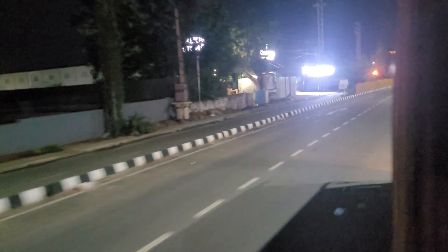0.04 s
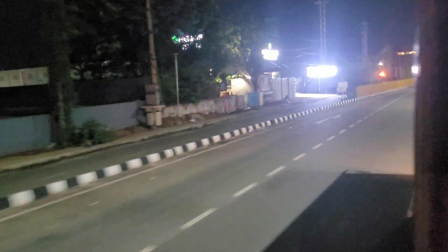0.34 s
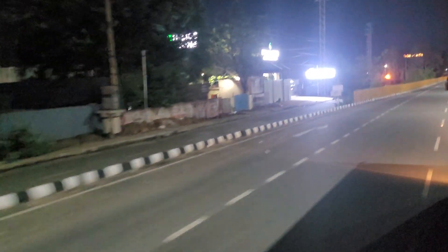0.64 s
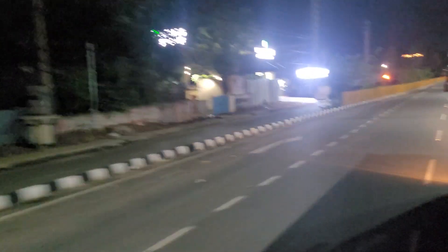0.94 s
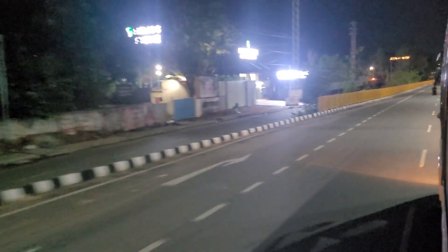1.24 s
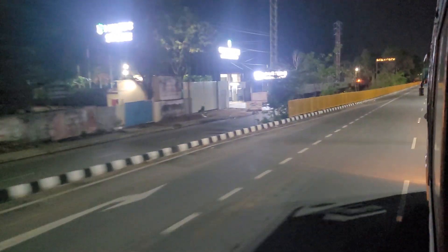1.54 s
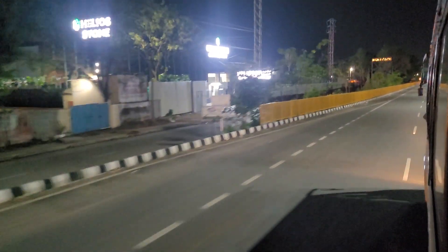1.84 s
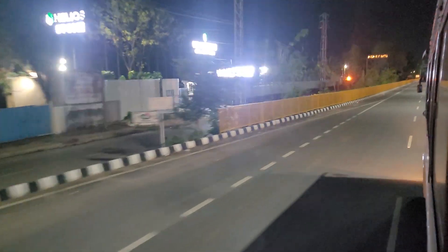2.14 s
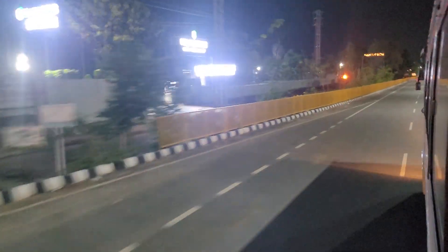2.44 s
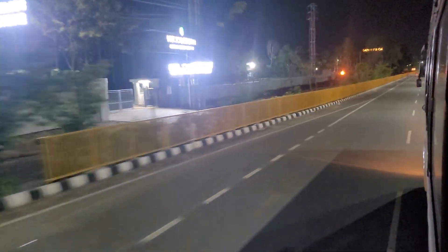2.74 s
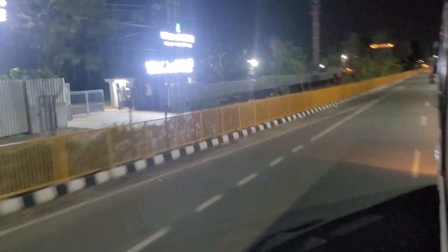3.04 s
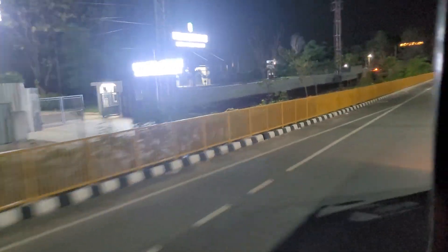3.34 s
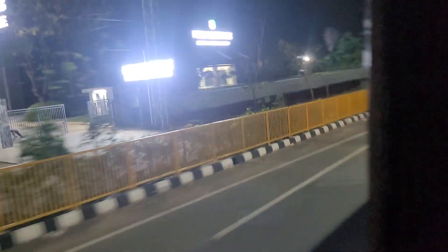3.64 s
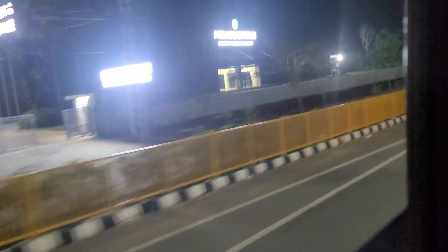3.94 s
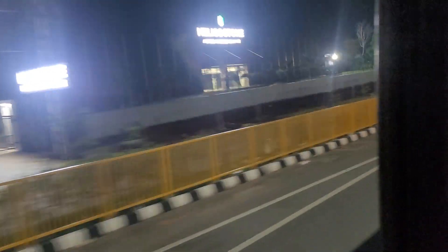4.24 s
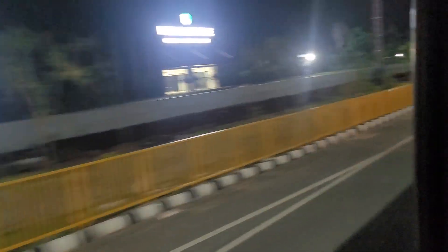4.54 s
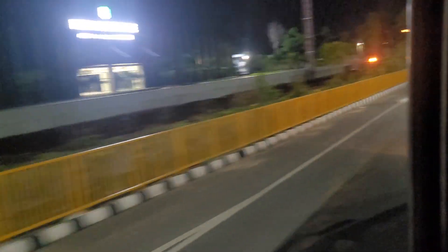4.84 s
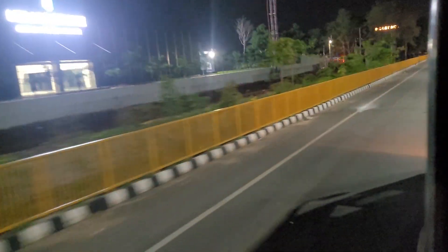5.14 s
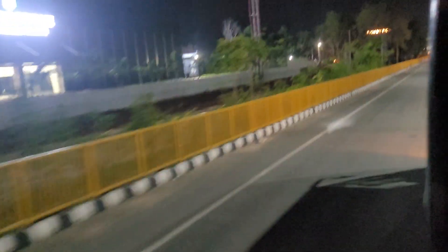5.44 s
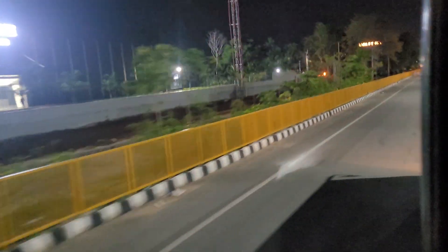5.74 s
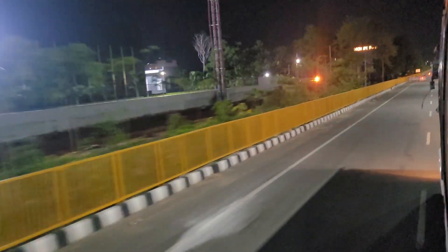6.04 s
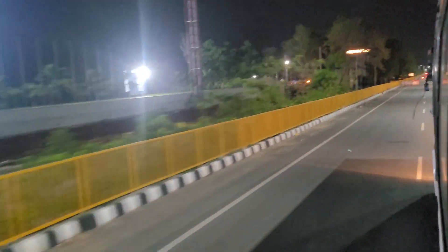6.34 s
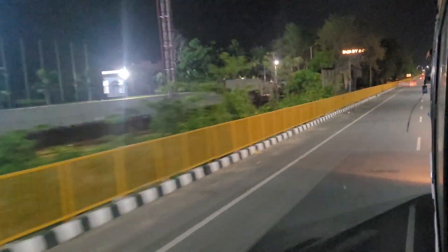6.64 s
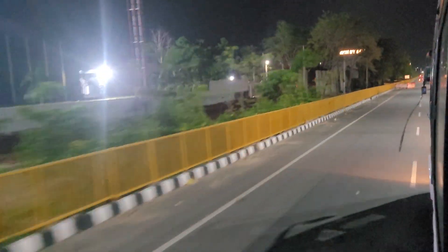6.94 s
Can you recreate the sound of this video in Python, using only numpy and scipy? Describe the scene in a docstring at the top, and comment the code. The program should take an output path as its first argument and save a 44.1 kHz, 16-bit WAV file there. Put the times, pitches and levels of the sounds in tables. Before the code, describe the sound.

Wind rushes over a microphone at the open window of a moving bus, with hollow hooting gusts, low thumps and sharp crackles. The buffeting is strong at first, eases, then grows roughest just past the middle before settling into a softer rush. Underneath, the engine drones and the tyres hiss on the road, with an occasional dull body knock and a tick from the window frame.

```python
"""Wind at an open bus window

A bus drives along a night road with a microphone at an open window. Air streams over the
microphone's two openings (ports), and swirls of air (eddies) hit them as gusts that hoot and fizz.
Big pressure swings thump; air tearing off the port edges pops and crackles. Under the wind
the engine drones, the tyres hiss, the body knocks and the window frame ticks now and then."""
import sys
import numpy as np
from scipy import signal
from scipy.fft import rfft, irfft
from scipy.io import wavfile
from scipy.ndimage import uniform_filter1d

SR = 44100
rng = np.random.default_rng(int(sys.argv[2]) if len(sys.argv) > 2 else 0)


def int16_out(signal):
    """Quantize to a 16-bit WAV file."""
    q = np.round(np.clip(np.atleast_2d(signal).T, -1, 1) * 32767)
    wavfile.write(sys.argv[1], SR, q.astype(np.int16))


N = 308259
TIME = np.arange(N) / SR

# strength of the air stream at the window: (time [s], level [dB])
STREAM = [(0, -26), (0.28, -31.5), (0.75, -32.5), (1, -32), (1.4, -31), (2.2, -32.5), (2.45, -26),
          (2.65, -30.5), (3.33, -30.5), (3.48, -26.5), (3.68, -32.5), (4.15, -31), (4.62, -33), (4.76, -28),
          (4.92, -30.5), (5.2, -35.5), (6.05, -34), (6.6, -33)]
# how far the air has turned from head-on (0) to skimming the ports (1): (time [s], share [0-1])
GRAZING = [(4.8, 0.68), (5.05, 1), (6.0, 1), (6.99, 0.92)]
# how hard the air tears at a port's edge: (time [s], level [dB])
TEARING = [(0, -53), (.7, -79), (2.1, -99), (2.45, -50), (3.25, -73), (3.42, -52), (3.8, -56.5),
           (4.33, -46.5), (4.8, -54), (5.3, -52), (6.2, -62), (6.75, -51.5)]
# big eddies: (time [s], level [dB], length [s], swirl pitch [Hz], hoot's share of the power [0-1])
GUSTS = [(.006, -19, 0.0082, 1010, 0.54), (0.05, -22, 0.01, 790, 0.5), (0.059, -28, 0.0057, 1080, 0.5),
         (.089, -17.5, 0.0084, 796, 0.4), (0.135, -17, 0.014, 737, 0.4), (0.175, -17, 0.014, 1080, 0.03),
         (0.36, -20.5, 0.01, 724, 0.1), (0.414, -23.5, 0.034, 996, 0), (.536, -22, 0.0049, 400, 0.57),
         (0.617, -17, 0.0084, 796, 0.5), (0.715, -30, 0.0065, 317, 0.2), (0.848, -23.5, 0.012, 340, 0.6),
         (.885, -29, 0.021, 777, 0.5), (.912, -30, 0.015, 498, 0.1), (1.079, -23.5, 0.013, 518, 0.04),
         (1.195, -23, 0.013, 726, 0.02), (1.321, -27, 0.0091, 260, 0), (1.426, -22.5, 0.022, 761, 0.42),
         (1.56, -21, 0.017, 785, 0.17), (1.594, -26, 0.016, 266, 0.6), (1.659, -24, 0.012, 390, 0),
         (1.745, -23.5, 0.017, 650, 0.03), (1.768, -23, 0.0057, 266, 0.56), (1.879, -21, 0.013, 880, 0.28),
         (1.951, -26.5, 0.028, 517, 0), (2.009, -21.5, 0.01, 393, 0.7), (2.057, -18.5, 0.0043, 307, 1),
         (2.093, -22, 0.014, 744, 0.07), (2.249, -24, 0.0092, 885, 0.6), (2.293, -21.5, 0.022, 730, 0.2),
         (2.38, -29, 0.039, 854, 0.8), (2.433, -22, 0.022, 830, 0.1), (2.581, -24, 0.014, 1040, 0.04),
         (2.64, -42, 0.0063, 316, 0), (2.736, -25, 0.01, 324, 0.8), (2.763, -25, 0.0085, 810, 0.04),
         (2.801, -20, 0.011, 420, 0.13), (2.832, -24, 0.021, 764, 0.05), (3.031, -20, 0.0057, 760, 0.1),
         (3.07, -19, 0.021, 730, 0.12), (3.133, -26, 0.026, 837, 0.15), (3.246, -26, 0.015, 409, 0.8),
         (3.324, -24, 0.011, 347, 0.5), (3.4, -18, 0.014, 870, 0), (3.453, -17.5, 0.0078, 810, 0.9),
         (3.474, -18.5, 0.0068, 810, 0.85), (3.513, -17.5, 0.023, 776, 0.4), (3.549, -20, 0.0076, 940, 0.5),
         (3.674, -24.5, 0.017, 890, 0.3), (3.747, -25.5, 0.0063, 690, 0.6), (3.789, -13, 0.01, 1060, 0),
         (3.808, -18.5, 0.008, 770, 0.8), (3.885, -22, 0.012, 386, 0), (3.925, -24.5, 0.0081, 596, 0),
         (4.017, -16, 0.016, 906, 0.2), (4.061, -22, 0.018, 780, 0.06), (4.121, -24, 0.023, 834, 0.56),
         (4.195, -25, 0.035, 798, 0.2), (4.24, -17, 0.01, 454, 0.45), (4.288, -19.5, 0.012, 1000, 0),
         (4.331, -16, 0.019, 748, 0.09), (4.404, -20, 0.014, 457, 0.36), (4.441, -19, 0.015, 1028, 0.1),
         (4.475, -16, 0.012, 1110, 0.25), (4.542, -20, 0.006, 336, 0.2), (4.588, -21, 0.01, 890, 0.28),
         (4.662, -26, 0.011, 825, 0), (4.724, -21.5, 0.028, 790, .45), (4.756, -29.5, 0.0088, 905, 0.7),
         (4.775, -20, 0.017, 744, 0.4), (4.825, -18, 0.0098, 760, 0.02), (4.848, -26, 0.0033, 770, 0),
         (4.9, -25, 0.014, 1390, 0.8), (4.933, -20.5, 0.011, 1420, 0.17), (4.955, -28, 0.011, 1650, 0.6),
         (5.021, -24, 0.0046, 714, 0.17), (5.059, -23.5, 0.025, 920, 0), (5.619, -28, 0.034, 700, 0.01),
         (5.67, -24, 0.017, 610, 0.06), (5.798, -34.5, 0.019, 309, 0.7), (5.957, -21.5, 0.014, 580, 0.3),
         (5.984, -18, 0.0087, 544, 0.4), (6.002, -23, 0.017, 1150, 0.4), (6.213, -27.5, 0.011, 373, 0.05),
         (6.345, -26.5, 0.026, 328, 0.07), (6.474, -24, 0.023, 356, 0), (6.536, -24, 0.025, 360, 0.24),
         (6.662, -26.5, 0.012, 345, 0.24), (6.742, -22.5, 0.012, 1150, 0), (6.801, -26.5, 0.038, 304, 0),
         (6.928, -21, 0.0095, 382, 0.1)]
# tone colours of head-on air, skimming air and deep rumble: (frequency [Hz], level [dB])
HEAD_ON_COLOUR = [(60, -24), (150, -5.5), (260, 2), (400, -1), (600, -1.5), (745, 6.5), (900, 4),
                  (1300, -8), (1650, -25), (2200, -34.5), (3000, -47), (5000, -56), (9000, -66),
                  (16000, -81)]
GRAZING_COLOUR = [(60, -12), (170, -3.5), (280, 3), (470, -3.5), (620, -8), (800, -12), (930, -10.5),
                  (1130, -6), (1400, -9.5), (2100, -17), (2900, -29), (3400, -32.5), (5000, -43.5),
                  (9000, -66), (16000, -78)]
RUMBLE_COLOUR = [(12, -13.5), (25, -11), (45, -8), (66, 2), (90, -3), (140, -4), (200, -11), (350, -28),
                 (800, -67.5)]
USUAL_SWIRL_HZ = 663


def gain_of(db):
    """Turns decibels into a factor to multiply by."""
    return 10 ** (np.asarray(db) / 20)


def evened(x):
    """Scales a signal to an average power of 1."""
    return x / np.sqrt(np.mean(x ** 2) + 1e-20)


def at(s, curve):
    """A curve's value at time s."""
    return np.interp(s, *np.transpose(curve))


def ports(pan_db):
    """Left and right gains; pan is the left level minus the right."""
    gains = gain_of(np.array([[.5], [-.5]]) * pan_db)
    return gains / np.sqrt(np.mean(gains ** 2, axis=0))


def add(mix, s, sound):
    """Mixes a stereo sound in at time s."""
    part = mix[:, max(round(s * SR), 0):][:, :sound.shape[1]]
    part += sound[:, :part.shape[1]]


def noise(size=N):
    """White noise, different left and right."""
    return rng.standard_normal((2, size))


def wander(hz, channels=2):
    """A smooth random curve that moves up to about hz times a second."""
    keep = np.exp(-(np.fft.rfftfreq(N, 1 / SR) / hz) ** 2)
    return evened(irfft(rfft(rng.standard_normal((channels, N))) * keep, N))


def response(points, size=4096):
    """A filter's answer to one click, with the given tone colour and energy 1."""
    hz, db = np.transpose(points)
    bin_hz = abs(np.fft.fftfreq(size, 1 / SR)) + 1
    log_gain = np.log(gain_of(np.interp(np.log(bin_hz), np.log(hz), db)))
    spectrum = np.exp(np.conj(signal.hilbert(log_gain)))  # nothing rings before the click
    taps = np.fft.ifft(spectrum).real[:size // 2]
    return taps / np.linalg.norm(taps)


def colour(x, points):
    """Filters both channels to a tone colour."""
    return signal.oaconvolve(x, response(points)[None], axes=1)[:, :N]


def turbulence(flicker_db, flicker_hz, size=1300):
    """Churning air: noise that comes in clumps, its power evened out over size samples."""
    clumps = noise() * gain_of(flicker_db * wander(flicker_hz))
    return clumps / np.sqrt(uniform_filter1d(clumps ** 2, size, axis=1) + 1e-9)


def span(s, before, after):
    """The samples around time s."""
    return slice(max(int((s - before) * SR), 0), int((s + after) * SR))


def swell(t, length, lean):
    """Power of one passing eddy, 1 at t = 0; lean makes it rise faster than it dies."""
    u = 2 * t / length
    return 2 ** -((u / (1 + lean * np.tanh(2 * u))) ** 2)


def lulls(length_s=0.043):
    """How many dB the wind drops as it briefly lets go of the ports."""
    # lulls, where a negative dip is a rise: (time [s], dip [dB])
    dips = [(.285, 3.5), (0.569, 3), (.69, 0), (0.751, 7), (1.228, 1.5), (1.365, 3.5), (1.63, 3), (1.8, -3),
            (1.985, 6), (2.15, -0.5), (2.68, 4), (2.97, 1), (3.288, 3), (3.728, 5), (3.848, 3), (4.16, 5.5),
            (4.512, 0.5), (4.995, 5.5), (5.15, 4.5), (5.205, 6), (5.54, 0), (5.74, 4), (5.895, 5),
            (6.14, 4)]
    return sum(db * np.exp(-(2 * (TIME - s) / length_s) ** 2) for s, db in dips)


def road_roar(level_db=-45.5):
    """The road fills the cabin with a low roar."""
    # the cabin's tone colour: (frequency [Hz], level [dB])
    cabin_colour = [(15, -39), (50, 13), (100, 2.5), (190, 0), (290, -4), (430, -8.5), (800, -32),
                    (1200, -22), (1700, -6.5), (2300, -9), (3000, -37), (6000, -49)]
    return colour(noise() * gain_of(level_db + 0.77 * wander(25)), cabin_colour) * ports(0.92)


def jolts(level_db=-46, bumpy_db=5.5):
    """Jolts make the cabin panels throb; the throb dips along with the wind's lulls."""
    # the panels' tone colour: (frequency [Hz], level [dB])
    panel_colour = [(20, 3), (60, -17), (110, -2.5), (190, -4), (270, 4.5), (400, -11), (600, -14),
                    (1200, -56), (4000, -79)]
    shaking = noise() * gain_of(level_db + bumpy_db * wander(7.5, channels=1) - 0.72 * lulls())
    return colour(shaking, panel_colour)


def tyres():
    """The tyres hiss on the road outside."""
    # strength of the hiss: (time [s], level [dB])
    hiss_levels = [(0, -59), (1.48, -58.5), (2.45, -57), (3.29, -56), (4.67, -62.5), (4.98, -59),
                   (5.88, -58), (6.35, -54.5)]
    # its tone colour: (frequency [Hz], level [dB])
    hiss_colour = [(500, -35), (2000, 11), (3200, 5.5), (4500, 4.5), (6000, 3.5), (7500, 4), (9000, -1),
                   (10200, 0.5), (12200, -0.5), (14000, -5), (16000, -7.5)]
    hiss = noise() * gain_of(at(TIME, hiss_levels) + 0.5 + 1.5 * wander(28))
    return colour(hiss, hiss_colour) * ports(0.93)


def engine(firing_hz=69.5, level_db=-56, waver=0.017):
    """The engine's firing makes one low, wavering tone."""
    turns = np.cumsum(firing_hz * (1 + waver * wander(5, channels=1))) / SR
    return np.sqrt(2) * gain_of(level_db + wander(2.8)) * np.sin(2 * np.pi * turns)


def frame_ticks(rise_s=0.0086, fade_60db_s=0.078, size=12000):
    """The loose window frame ticks brightly in its rail."""
    # ticks: (time [s], level [dB], ring pitch [Hz])
    ticks = [(2.596, -42, 12000), (5.283, -58, 7600), (6.075, -51, 9600), (6.867, -46.5, 9200)]
    out, t = np.zeros((2, N)), np.arange(size) / SR
    for s, db, hz in ticks:
        metal = response([(hz / 4, -20), (hz / 2, -6), (hz / 1.2, -4),
                          (hz, 0), (hz * 1.2, -4), (hz * 2, -9)])
        chatter = noise(size) * gain_of(db + 4.5 - 60 * t / fade_60db_s)
        chatter *= 1 - np.exp(-t / rise_s)
        add(out, s, signal.oaconvolve(chatter, metal[None], axes=1))
    return out


def body_knocks(rise_s=0.0013):
    """The bus body answers bumps in the road with a dull knock."""
    # knocks: (time [s], level [dB], pitch [Hz], time to fade by 60 dB [s])
    knocks = [(0.531, -13, 384, 0.03), (2.605, -18.5, 140, 0.12), (4.285, -17.5, 77.5, 0.11),
              (5.391, -20, 280, 0.035), (5.443, -24.5, 292, 0.089)]
    out, t = np.zeros((2, N)), np.arange(12000) / SR
    for s, db, hz, fade_s in knocks:
        ring = np.sin(2 * np.pi * hz * t) * (1 - np.exp(-t / rise_s))
        add(out, s, ports(1.5) * ring * gain_of(db - 60 * t / fade_s))
    return out


def rumble(base_db=-36, usual_stream_db=-33.5, sway_db=2.5):
    """Large eddies keep shaking the air in the window opening."""
    # head-on air rumbles mostly on the left, skimming air more evenly: (time [s], pan [dB])
    pans = [(0, 7), (4.7, 10), (5.1, 6.5), (6.99, -2)]
    level_db = base_db + 0.45 * (at(TIME, STREAM) - usual_stream_db) - 2 * at(TIME, GRAZING)
    level_db += sway_db * wander(0.83, channels=1)[0] - 0.55 * lulls()
    flow = gain_of(level_db) * ports(at(TIME, pans))
    return colour(flow * turbulence(flicker_db=5, flicker_hz=49.7), RUMBLE_COLOUR)


def stream(split_hz=520):
    """The steady stream of air sounds the ports, which ring hollow when it meets them head-on."""
    grazing = at(TIME, GRAZING)
    sway_db = 1.8 * (1 - .4 * grazing) * wander(30, channels=1)  # skimming air is calmer
    push = gain_of(at(TIME, STREAM) + 0.66 + sway_db - lulls())
    # large (low) and small (high) eddies come and go separately
    lows, highs = (signal.butter(3, split_hz, kind, fs=SR, output="sos") for kind in ("low", "high"))
    large = signal.sosfilt(lows, turbulence(flicker_db=11, flicker_hz=89))
    small = signal.sosfilt(highs, turbulence(flicker_db=3.5, flicker_hz=152))
    small *= gain_of(1.3 * wander(35))
    large *= gain_of(0.5 * wander(21))
    air = push * (large + small)
    head_on = colour(air * np.sqrt(1 - grazing), HEAD_ON_COLOUR)
    return head_on + colour(air * np.sqrt(grazing), GRAZING_COLOUR)


def crackle(snaps_per_s=170, spread_db=4.3, fade_s=0.001, pan_db=-3.5):
    """Tiny pressure snaps of uneven size where the air tears away from a port."""
    # the snaps' tone colour: (frequency [Hz], level [dB])
    snap_colour = [(500, -40), (1800, 11), (2800, 5), (3900, 1.5), (5200, -5.5), (7700, -12), (12000, -14),
                   (16000, -21)]
    sizes = gain_of(spread_db * np.minimum(rng.exponential(1, (2, N)), 3))
    snaps = sizes * (rng.random((2, N)) < snaps_per_s / SR)
    tails = signal.lfilter([1], [1, -np.exp(-1 / (fade_s * SR))], snaps)
    spray = evened(tails * noise())
    return colour(spray * gain_of(at(TIME, TEARING) - lulls()) * ports(pan_db), snap_colour)


def fizz(offset_db=-28, db_per_octave=8.5, usual_tearing_db=-54.5):
    """A gust fizzes at its peak, the more the faster it swirls and the harder the air tears."""
    # the fizz's tone colour: (frequency [Hz], level [dB])
    fizz_colour = [(1000, -43), (2000, 18.5), (2800, 9.5), (4000, 4), (5500, -13), (8000, -15),
                   (15000, -43)]
    power = np.zeros(N)
    for s, db, length, swirl_hz, _ in GUSTS:
        fizz_db = db + offset_db + db_per_octave * np.log2(swirl_hz / USUAL_SWIRL_HZ)
        fizz_db += at(s, TEARING) - usual_tearing_db
        near = span(s, 4 * length, 4 * length)
        power[near] += gain_of(fizz_db) ** 2 * swell(TIME[near] - s, length, lean=0.14)
    return colour(np.sqrt(power) * turbulence(flicker_db=-1, flicker_hz=215), fizz_colour)


def thumps(churn_db=-6.5, thump_db=-2, lead_s=0.0045):
    """A heavy pressure swing thumps one port, then the other, inside a swell of churning air."""
    # swings in the window opening: (time [s], level [dB], length [s], pan [dB], right port's delay [s])
    swings = [(0.026, -24, 0.021, 5, 0.0036), (0.097, -28.5, 0.045, 17, -0.004),
              (0.172, -23, 0.018, 2, -0.004), (0.222, -27, 0.026, 21, 0.002),
              (0.371, -24, 0.019, 16, 0.008), (0.432, -33, 0.017, 18, 0.007), (0.629, -40, 0.024, 3, 0.008),
              (0.925, -31, 0.03, 1, -0.005), (1.059, -32, 0.034, 7, 0.002), (1.184, -32, 0.021, 1, -0.008),
              (1.313, -29.5, 0.02, -13, -0.0064), (1.462, -31, 0.025, 1, -0.001),
              (1.782, -33, 0.027, 8, 0.00016), (1.889, -22.5, 0.013, 5, 0.001),
              (2.303, -30, 0.015, 17, 0.003), (2.459, -36, 0.032, 16, 0.003),
              (2.526, -35, 0.029, -5, -0.006), (2.758, -27, 0.021, -2, -0.0),
              (2.828, -31.5, 0.039, 6, -0.001), (3.33, -30, 0.027, 1, -0.005),
              (3.444, -22.0, 0.015, 11, 0.0044), (3.528, -19.5, 0.02, 0, -0.007),
              (3.594, -26, 0.032, 20, 0.003), (3.669, -28.5, 0.039, 7, -0.003),
              (3.784, -19, 0.017, -2, -0.005), (3.901, -23.5, 0.023, 4, 0.0037),
              (3.977, -28, 0.028, 20, 0.029), (4.067, -25, 0.018, 0, 0.005), (4.146, -29, 0.052, 20, 0.021),
              (4.292, -20.5, 0.027, 14, -0.00064), (4.381, -23.5, 0.047, -2, -0.007),
              (4.475, -21, 0.016, 0, 0.006), (4.656, -25.5, 0.022, 19, -0.003),
              (4.719, -18.5, 0.018, 5, -0.0045), (4.771, -23, 0.021, 3, 0.0016),
              (4.826, -25, 0.017, -13, -0.0), (4.924, -21.5, 0.019, 0.5, -0.007),
              (4.968, -30, 0.025, 0, 0.00024), (5.046, -28, 0.03, -3, -0.0051),
              (5.618, -32, 0.036, 1, 0.005), (5.673, -29, 0.02, 3, 0.001), (5.807, -32, 0.03, 3, 0.001),
              (5.99, -20.5, 0.018, 4, 0.0), (6.079, -32, 0.022, 11, -0.0061),
              (6.223, -29.0, 0.027, -1, 0.001), (6.283, -28, 0.03, 0, 0.002),
              (6.378, -34, 0.034, 11, 0.015), (6.44, -26, 0.021, -4, 0.001),
              (6.56, -24.5, 0.018, 0, -0.0017), (6.742, -34, 0.019, 0, -0.000012),
              (6.953, -24, 0.018, 9.5, 0.0)]
    out, air = np.zeros((2, N)), turbulence(flicker_db=7.5, flicker_hz=50)
    for s, db, length, pan_db, lag_s in swings:
        gain = gain_of(db) * ports(pan_db)
        near = span(s, 3 * length, 4 * length)
        push = np.sqrt(swell(TIME[near] - s, length, lean=0.58))
        out[:, near] += gain * gain_of(churn_db) * air[:, near] * push
        thump = gain * gain_of(thump_db) * np.sqrt(length * SR) * rng.choice([-1, 1])
        add(out, s - lead_s - lag_s / 2, thump * [[1], [0]])
        add(out, s - lead_s + lag_s / 2, thump * [[0], [1]])
    return colour(out, RUMBLE_COLOUR)


def slaps(rise_s=0.0001, fade_s=0.0022, flaps=3, gap_s=0.00219, flap_step_db=-4.5, size=700):
    """A jet of air breaks off a port's edge: it spits hiss, and its weakening flaps pop the port."""
    # the sharpest slaps: (time [s], spit level [dB], pop level [dB], pan [dB])
    hits = [(0.0052, -27.5, -14.5, 1), (0.0646, -35.0, -16, -1), (0.0881, -23, -9.5, -16),
            (0.0936, -32, -21, -7), (0.1084, -39.0, -15.5, 17), (0.1468, -39, -15.5, 14),
            (0.1686, -20.5, -11.5, -23), (0.1778, -28, -14, -9), (0.2556, -32, -20.5, -20),
            (0.3392, -34, -19, -11), (0.3579, -36, -18, 11), (0.3971, -32, -16.5, -14),
            (0.4067, -28, -15, -9), (0.52, -30, -20.5, -10), (0.6171, -51, -21, 7), (1.187, -38.0, -15, 6),
            (1.4246, -46.5, -22, 0), (1.8752, -51, -18, -5), (2.278, -38, -17, -3), (2.2926, -36, -20, 9),
            (2.4291, -30, -15.5, -8), (2.4828, -27.5, -10.5, -1), (2.8256, -31.5, -14, -6),
            (3.392, -29.5, -10.5, -9), (3.405, -26, -22, -19), (3.4163, -46.0, -17, -12),
            (3.435, -32, -24, -15), (3.4548, -35.5, -17, -5), (3.472, -37, -17, 2), (3.5, -35.5, -17.0, 2),
            (3.5165, -26.5, -13.0, -10), (3.5533, -40, -18.0, -11), (3.5805, -31, -21, -15),
            (3.7055, -30, -22, -10), (3.7798, -29, -10, -1), (3.7902, -46, -15, 15), (3.882, -31, -21, -11),
            (3.9628, -31, -17, -16), (3.9841, -28, -16.5, -18), (4.0215, -31, -11.5, 2),
            (4.054, -28.5, -11, -5), (4.0674, -42, -10, -12), (4.121, -34, -16, -18), (4.2364, -44, -17, 4),
            (4.269, -34, -34.0, -9), (4.283, -34, -17, 10), (4.2896, -24, -16, -17), (4.3034, -30, -31, -9),
            (4.323, -38, -15, 4), (4.3359, -17.5, -14.0, 2), (4.3436, -26, -10.5, 1),
            (4.3524, -31, -18, -19), (4.3746, -27, -14, -12), (4.4087, -38, -24.5, -13),
            (4.4418, -36, -14, 7), (4.4797, -22, -11.5, -13), (4.494, -32, -18, -15),
            (4.5805, -48, -17, 16), (4.5869, -50, -20, -22), (4.6275, -30, -19, -11),
            (4.7259, -40.5, -22, 5), (4.7393, -30, -16, -4), (4.7436, -27, -32, -3), (4.7693, -30, -23, 0),
            (4.7801, -27.0, -14.5, 15), (4.822, -28, -10.0, -10), (4.848, -35.0, -14.5, 9),
            (4.8979, -33, -13, 1), (4.9329, -35, -19.5, 3), (5.9542, -42.0, -28, -11),
            (5.9805, -28.5, -20, -4), (5.9878, -28, -15.0, -2), (6.0068, -23.5, -20, -15)]
    # tone colours of the spit and the hollow pop: (frequency [Hz], level [dB])
    spit_colour = [(300, -20), (1000, -7), (2300, 29), (3800, 15), (5000, 10.5), (6300, 1.5), (7600, 2.5),
                   (9500, -5), (15000, -8)]
    pop_colour = [(60, -36.5), (300, -1), (580, -7.5), (800, 1.5), (1300, -5.5), (2000, -14), (3000, -43.5),
                  (5000, -51), (9000, -58), (16000, -74)]
    spit, pop, t = np.zeros((2, N)), np.zeros((2, N)), np.arange(size) / SR
    strengths = gain_of(flap_step_db * np.arange(flaps))
    strengths *= np.sqrt(0.0018 * SR) / np.linalg.norm(strengths)  # share 1.8 ms worth of energy
    for s, spit_db, pop_db, pan_db in hits:
        burst = noise(size) * (1 - np.exp(-t / rise_s)) * np.exp(-t / fade_s)
        add(spit, s, gain_of(spit_db) * ports(pan_db + 1.5) * burst)
        gaps = gap_s * rng.uniform(.6, 1.4, flaps)
        for delay, strength in zip(np.cumsum(gaps) - gaps[0], strengths):
            # each flap reaches the two ports at slightly different moments
            push = np.zeros((2, size))
            push[[0, 1], rng.integers(5, 45, 2)] = rng.choice([-1, 1], 2)
            add(pop, s + delay, strength * gain_of(pop_db - 1) * ports(pan_db) * push)
    return colour(spit, spit_colour) + colour(pop, pop_colour)


def small_eddies(per_s=4, above_db=4, spread_db=1.5, length_s=0.01, spread_octaves=0.464, hoot=0.42):
    """Rows like those of GUSTS for small eddies that come by chance, a little above the stream."""
    # they swirl more slowly where the air only skims the ports: (time [s], pitch [Hz])
    pitches = [(4.8, 571), (5.05, 314)]
    count = int(per_s * N / SR)
    times, flow_db = rng.uniform(0, N / SR, count), at(TIME, STREAM) - lulls()
    return [(s, flow_db[int(s * SR)] + above_db + spread_db * strength, length_s,
             at(s, pitches) * 2 ** (spread_octaves * speed), hoot)
            for s, (strength, speed) in zip(times, rng.standard_normal((count, 2)))]


def gusts(rows, swirl_db=3, swirl_octaves=0.3, wobble=0.1, max_hoot=0.7):
    """Each gust is a puff of churning air with a hollow hoot at the unsteady pitch of its swirl."""
    out, air = np.zeros((2, N)), turbulence(flicker_db=5.5, flicker_hz=189, size=500)
    wobbly_time = np.cumsum(1 + wobble * wander(160), axis=1) / SR
    hz = np.geomspace(40, 16000, 120)
    head_on, grazing = (np.interp(np.log(hz), np.log(points[:, 0]), points[:, 1])
                        for points in map(np.array, (HEAD_ON_COLOUR, GRAZING_COLOUR)))
    for (s, db, length, swirl_hz, hoot_share), phase in zip(rows, rng.random((len(rows), 2, 1))):
        shape_db = head_on + at(s, GRAZING) * (grazing - head_on)
        shape_db -= 1 / (1 + (hz / 480) ** 4)  # slightly less bass
        shape_db += swirl_db * np.exp(-.5 * (np.log2(hz / swirl_hz) / swirl_octaves) ** 2)
        port_ring = response(np.transpose([hz, shape_db]), size=2048)
        near = span(s, 2 * length, 4 * length)
        push = np.sqrt(swell(TIME[near] - s, length, lean=0.21))
        puff = signal.fftconvolve(air[:, near] * push, port_ring[None], axes=1)
        puff *= np.sqrt(np.sum(push ** 2) / np.sum(puff ** 2, axis=1, keepdims=True))
        turns = swirl_hz * (wobbly_time[:, near] - wobbly_time[:, [min(int(s * SR), N - 1)]])
        hoot = np.sqrt(2) * push * np.sin(2 * np.pi * (turns + phase))
        pan_db = -0.15 - 2 * np.log2(swirl_hz / USUAL_SWIRL_HZ)  # fast swirls lean to the right
        gain = gain_of(db - 0.02) * ports(pan_db)
        hoot_share = min(hoot_share, max_hoot)
        add(out, near.start / SR, gain * np.sqrt(1 - hoot_share) * puff)
        add(out, near.start / SR, gain * np.sqrt(hoot_share) * hoot)
    return out


def scene():
    """Wind at the microphone over the sounds of the bus."""
    wind = stream() + gusts(GUSTS + small_eddies()) + fizz() + crackle() + rumble() + thumps() + slaps()
    bus = frame_ticks() + body_knocks() + road_roar() + jolts() + tyres() + engine()
    return wind + bus


def record(dry, top_hz=15980):
    """Clips the sound at full scale and cuts the highest treble."""
    low_pass = signal.firwin(801, top_hz, window=("kaiser", 9), fs=SR)
    return signal.oaconvolve(np.clip(dry, -1, 1), low_pass[None], "same")


dry = scene()
out = record(dry)
int16_out(out)
```